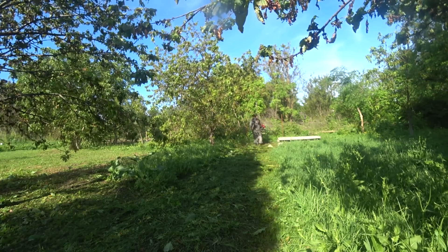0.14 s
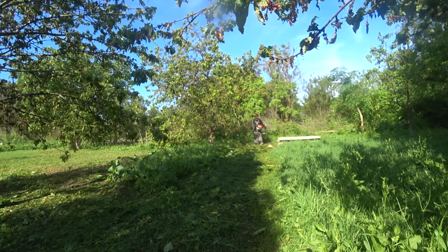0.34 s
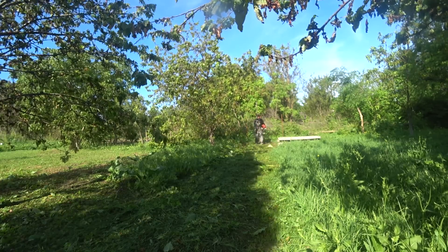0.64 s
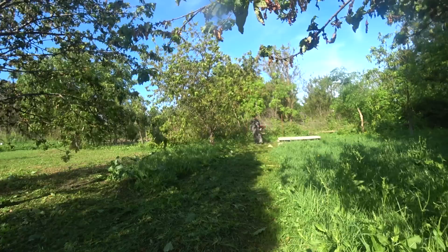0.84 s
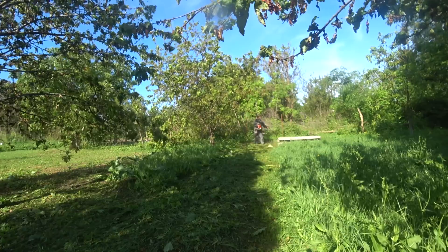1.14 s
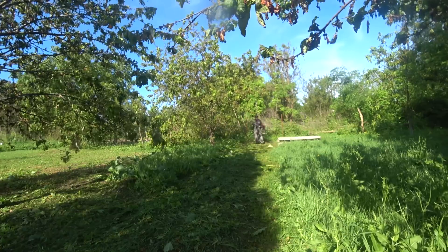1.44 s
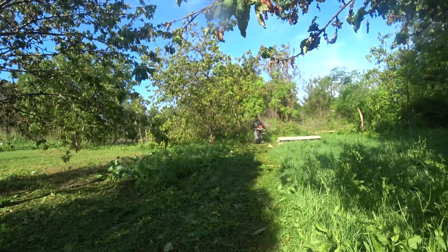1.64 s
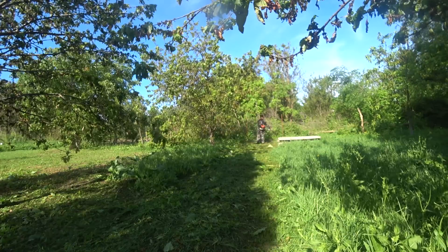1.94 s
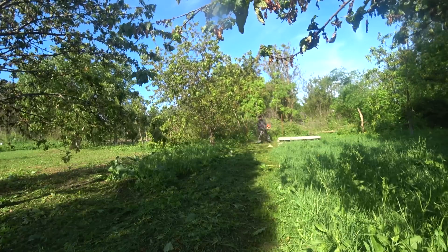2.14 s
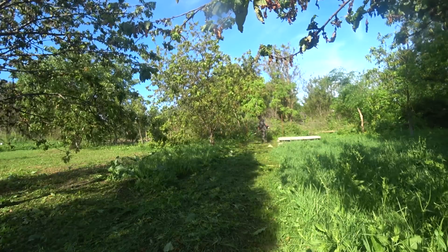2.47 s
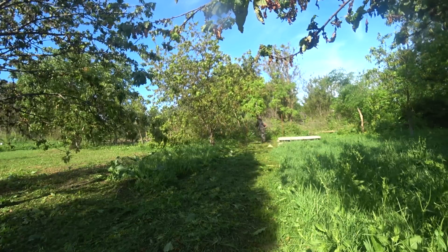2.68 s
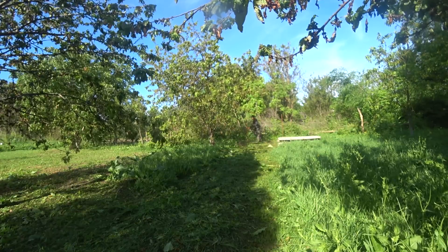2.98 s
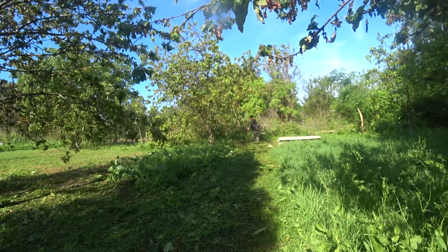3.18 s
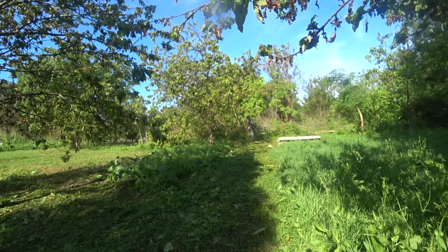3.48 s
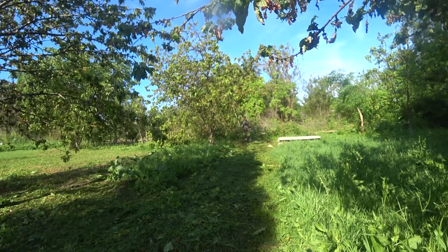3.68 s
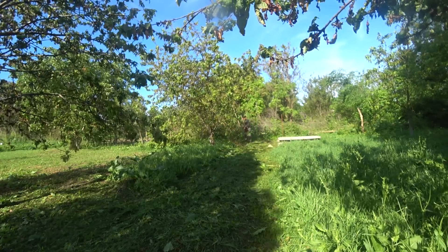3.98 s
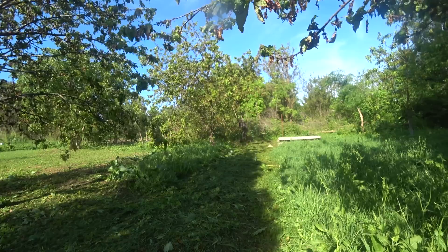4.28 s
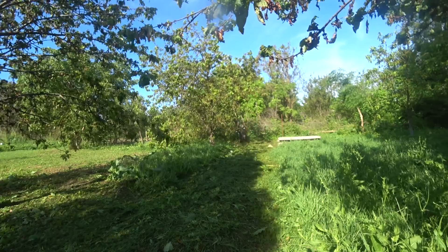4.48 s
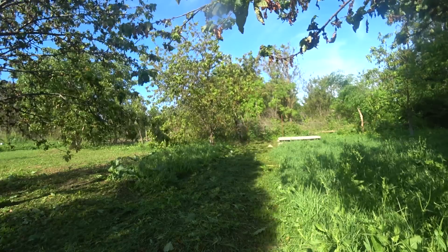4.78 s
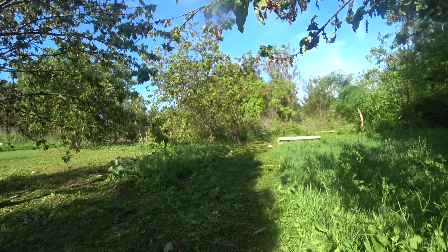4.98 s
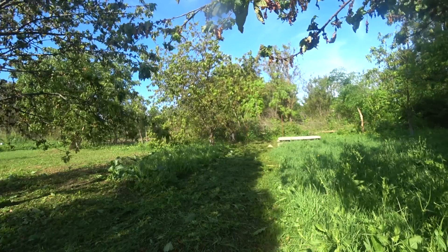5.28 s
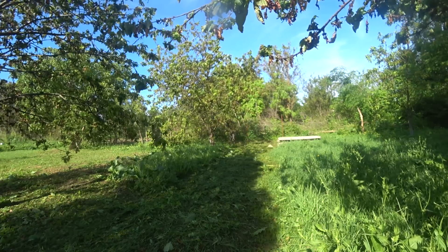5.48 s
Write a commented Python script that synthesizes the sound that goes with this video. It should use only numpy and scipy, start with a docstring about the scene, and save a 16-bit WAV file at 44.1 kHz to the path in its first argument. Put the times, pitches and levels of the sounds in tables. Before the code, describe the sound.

A petrol string trimmer runs continuously at full speed some distance away in a grassy orchard. Its high, raspy whine wavers with each swing and dips briefly in thick grass, most deeply just after two seconds. Bright swishing and engine hiss surround it. Later it sounds thinner and duller, with separate strokes through stalks. Open air, nearly mono, distant fixed microphone.

```python
"""A brush cutter runs flat out some way off in an orchard, swung from side to side through grass.
From the start its firings give a high whine, a stack of overtones that sags when the line bites into thick grass.
Exhaust and fan noise hisses once a firing, the line swishes as shaped bright noise, and wind adds a dull rumble.
From 2 s the worker moves behind trees and the overtones change; just after comes the deepest bite,
and the low rumble is faint after 2.2 s. Single puffs and strokes through long stalks follow, nearly mono."""
import sys
import numpy as np
from scipy import signal
from scipy.fft import rfft, irfft, next_fast_len
from scipy.io import wavfile
from scipy.ndimage import uniform_filter1d

SR = 44100
rng = np.random.default_rng(int(sys.argv[2]) if len(sys.argv) > 2 else 0)


def bounce(signal):
    """Save signal as a 16-bit WAV file at the path given by the first command-line argument."""
    frames = np.transpose(np.atleast_2d(signal))
    limited = np.clip(frames, -1, 1)
    pcm = np.round(limited * 32767).astype(np.int16)
    wavfile.write(sys.argv[1], SR, pcm)


N = 247842

# Lead overtones, whose levels are set one by one: (multiple of the firing rate)
LEAD_ORDERS = [1, 2, 3, 4, 5, 6, 7, 8, 9, 10, 12, 13, 21]
# Tone colour of the line in the stalks: (frequency [Hz], relative level [dB per Hz])
SWISH_COLOUR = [(300, -90), (4000, -40), (9000, -9), (11500, 0), (14000, 0), (16000, 2)]
HIGH_ORDER = 8  # first of the high overtones


def undb(db):
    """Turn decibels into a gain."""
    return 10 ** (np.asarray(db) / 20)


def columns(table):
    """Draw every column after the time column as a curve over all samples."""
    s, *rest = np.transpose(table)
    return [np.interp(np.arange(N) / SR, s, c) for c in rest]


def hump(s, rise_s, hold_s, back_s):
    """Rise smoothly to 1 at time s, hold, then fall back quickly at first and ever more slowly."""
    t = np.arange(N) / SR - s
    rise = np.sin(np.pi / 2 * np.clip(1 + t / max(rise_s, 1 / SR), 0, 1)) ** 2
    fall_back = np.exp(-np.clip(t - hold_s, 0, None) / back_s)
    return rise * fall_back


def bursts(base_db, events):
    """Add the power of bell-shaped bursts to a base level; all in dB."""
    t = np.arange(N) / SR
    power = 0
    for s, db, length in events:
        bell = np.exp(-np.minimum((4 * (t - s) / length) ** 2, 99))
        power = power + undb(2 * db) * bell
    return 10 * np.log10(undb(2 * base_db) + power)


def walk(rate):
    """Wander smoothly between random levels, about `rate` new ones a second, with a spread near 1."""
    k = int(SR / rate)
    steps = np.repeat(rng.standard_normal(N // k + 1), k)
    smooth = uniform_filter1d(uniform_filter1d(steps, k), k)
    return 1.35 * smooth[:N]


def colour(x, shape):
    """Give white noise the tone colour of (Hz, dB) points, then bring its average strength (rms) to 1."""
    n = next_fast_len(N)
    hz, db = np.transpose(shape)
    bin_hz = np.arange(n // 2 + 1) * SR / n
    gain = undb(np.interp(np.log(bin_hz + 1), np.log(hz), db))
    y = irfft(rfft(x, n) * gain, n)[:N]
    return y / np.sqrt(np.mean(y ** 2))


def whine(hz, turns, lead_db, fade_rate=9., high_fade_rate=14., flutter_db=1.5, edge_db=0.35):
    """Sum overtones of the firing rate; those between the leads copy their neighbours and fade by echoes."""
    # Usual balance of the overtones: (multiple of the firing rate, level [dB])
    order_db = [(1, -21), (2, -21), (3, -8), (4, -16), (5, -6), (6, -6), (7, -11), (8, -4), (9, -5),
                (10, -9), (11, -9), (12, -4), (13, -1), (14, -9), (15, -11), (16, -11), (17, -13),
                (18, -11), (19, -14), (20, -12), (21, -9), (22, -13), (23, -16), (24, -13), (25, -14),
                (26, -18), (27, -18)]
    # Ringing of the silencer, which lifts an overtone that sags onto it: centre [Hz], width [Hz], lift [dB]
    silencer = (3574, 130, 7.7)
    orders, usual_db = np.transpose(order_db)
    ring_hz, width_hz, ring_db = silencer
    lift_db = [db - usual_db[k - 1] for k, db in zip(LEAD_ORDERS, lead_db)]
    turns = turns + .003 * walk(60)  # uneven firing shakes the timing, most heard high up
    labour_hz = np.clip(550 - hz, 0, 40)  # below 550 firings a second the engine counts as labouring
    out = 0
    for k, db in zip(orders, usual_db):
        # blend the lifts of the lead overtones on either side
        place = np.interp(k, LEAD_ORDERS, np.arange(len(LEAD_ORDERS)))
        below = min(int(place), len(LEAD_ORDERS) - 2)
        db = db + (below + 1 - place) * lift_db[below] + (place - below) * lift_db[below + 1]
        db = db - edge_db * labour_hz * max(k - 2 * HIGH_ORDER, 0)  # a labouring engine loses its edge
        db = db + flutter_db * walk(50)
        db = db + ring_db / (1 + (2 * (k * hz - ring_hz) / width_hz) ** 2)
        tone = np.exp(2j * np.pi * (k * turns + rng.random()))
        if k not in LEAD_ORDERS:
            scattered = .2 + .03 * k  # echo share grows with pitch
            # short waves break up faster in the air
            rate = high_fade_rate if k > LEAD_ORDERS[-2] else fade_rate
            # straight path plus drifting echoes off ground and trunks
            paths = 1 + scattered * (walk(rate) + 1j * walk(rate))
            tone = tone * paths / np.sqrt(1 + 2 * scattered ** 2)
        out = out + np.sqrt(2) * undb(db) * tone.imag
    return out


def leads(loss_db):
    """Set the level [dB] of each lead overtone from swing, colour shift, trees, bites and its own waver."""
    # Swing of the cutter: (time [s], whine level [dB], turn [about -1..1], second colour shift [-1..1])
    swing = [(0.0, -0.3, 0.0052, 0.24), (0.1, -0.3, 0.38, 0.39), (0.27, 0.5, 0.78, 0.25),
             (0.37, 2.5, -0.22, -0.21), (0.47, 0, -0.99, 0.51), (0.58, -1.6, -0.99, 0.38),
             (0.65, 1.5, -0.23, -0.16), (0.8, -1, 0.78, 0.33), (0.97, -0.3, 0.89, 0.59),
             (1.06, 1.6, -0.64, -0.12), (1.16, -0.9, -0.73, 0.016), (1.28, 1.1, -1, 0.017),
             (1.37, 0.2, 0.01, 0.14), (1.47, -2.3, 0.99, 0.64), (1.61, 0.2, 0.62, 0.3),
             (1.69, 1, -0.11, -0.25), (1.78, -2, -1.02, 0.038), (1.87, -0.5, -0.52, 0.31),
             (2.0, 2, -0.52, 0.16), (2.13, -1.7, 0.21, 0.16), (2.38, -0.7, 0.19, -0.18),
             (2.55, -1, -0.034, -0.43), (2.75, 1, 0.43, -0.08), (2.94, -0.2, -0.13, -0.45),
             (3.1, 0.3, 0.07, -0.7), (3.25, 2.5, 0.77, -0.5), (3.5, 0.5, 0.0078, -0.58),
             (3.7, 2, 0.31, -0.25), (3.9, 1.7, -0.11, -0.42), (4.08, -1.8, -0.36, -0.7),
             (4.16, -1.5, 0.26, 0.63), (4.3, -0.8, -0.17, -0.33), (4.45, -0.5, 0.34, -0.56),
             (4.57, 1.5, -0.28, -0.22), (4.69, -1.5, 0.32, -0.71), (4.8, -0.5, -0.042, 0.17),
             (4.98, 0, 0.41, 0.44), (5.12, 0.3, -0.47, 0.11), (5.22, 0, 0.14, 0.28),
             (5.35, 0.5, -0.49, 0.6), (5.44, -1, -0.068, 0.63), (5.62, -0.9, 0.034, 0.92)]
    # One row per lead overtone: (starting level [dB], change at full turn [dB], change at full shift [dB],
    # change behind the trees [dB], share of the loss in a bite [ratio])
    lead_levels = [(-54.5, -0.5, 1.8, -8.5, 0.77), (-59, 2.7, -5, 1.8, 0.16), (-42.5, 2.5, 2, -3, 1.03),
                   (-52, 4.5, 0.5, -0.5, 0.8), (-40, 4.5, -4, -8.5, 0.9), (-42, 2.5, -5, -5.5, 2.1),
                   (-46.5, 1.5, 6.5, -5.5, 0.39), (-38.5, -3.5, -3, -3.5, 0.96),
                   (-38.5, -1.5, -3.1, -10, 1.2), (-44.5, -3.3, -2.5, -5.5, 0.7),
                   (-37, -2.5, 6.5, -18, 0.82), (-35.5, -4, 0.2, -8, 1.2), (-42, -2.2, 4.5, -6, 0.55)]
    # How much each lead overtone wavers by itself: (spread [dB])
    lead_waver_db = [0.31, 2.74, 0.73, 2.3, 1.4, 2.5, 2.5, 1.92, 2.2, 2.4, 3.14, 2.45, 1.3]
    level_db, turn, shift = columns(swing)
    trees_from_s, trees_full_s = 1.96, 5.08  # the worker moves behind trees
    trees = np.clip((np.arange(N) / SR - trees_from_s) / (trees_full_s - trees_from_s), 0, 1)
    out_db = []
    for k, row, waver_db in zip(LEAD_ORDERS, lead_levels, lead_waver_db):
        db, turn_db, shift_db, trees_db, share = row
        db = db + level_db + turn_db * turn + shift_db * shift + trees_db * trees
        db = db - share * loss_db[int(k >= HIGH_ORDER)]
        out_db.append(db + waver_db * walk(15))
    return out_db


def bites():
    """Thick grass drags the line: firing slows [Hz], low and high overtones lose dB, hiss changes by dB."""
    # Bites into thick grass: (time at the slowest [s], drop [Hz], fall [s], hold [s],
    # loss of low overtones [dB], loss of high overtones [dB, minus = gain], extra hiss [dB])
    bite_list = [(0.197, 31.87, 0.043, 0.019, 5.7, -3.5, -1.5), (0.874, 30.93, 0.035, 0.024, 5.8, 0, 1),
                 (1.531, 37.96, 0.048, 0.019, 4.84, -0.5, 2), (2.193, 112, 0.045, 0.099, 21.5, 21, -2.5),
                 (2.458, 52.06, 0.041, 0.011, 21, 14, 2), (3.028, 39.96, .06, 0.0051, 8.5, 8, -1.5),
                 (3.55, 30.07, 0.076, .005, 3.2, -1.5, -5.5),
                 (3.792, 29.94, 0.077, 0.00516, 1.8, 1.5, -1.5),
                 (4.225, 39.94, 0.068, 0.0052, 5.3, -0.5, -.5), (4.914, 72.04, 0.063, .005, 23.7, 16, -2),
                 (5.528, 43.7, 0.053, 0.0055, 14.5, -4, 1)]
    recover_s, loss_recover_s = .025, 0.01  # time constants of the return
    early_s = 0.0091  # the whine thins this much before the speed is lowest
    sag_hz, low_db, high_db, extra_db = 0, 0, 0, 0
    for s, drop_hz, fall_s, hold_s, low_loss_db, high_loss_db, gas_db in bite_list:
        sag = hump(s, fall_s, hold_s, recover_s)
        thin = hump(s - early_s, fall_s - early_s, hold_s + early_s / 2, loss_recover_s)
        sag_hz = sag_hz + drop_hz * sag
        extra_db = extra_db + gas_db * sag
        low_db = low_db + low_loss_db * thin
        high_db = high_db + high_loss_db * thin
    return sag_hz, (low_db, high_db), extra_db


def hiss(turns, db, pulse=0.15):
    """Exhaust gas and cooling fan make rushing noise that swells once a firing."""
    # Tone colour of gas and fan: (frequency [Hz], relative level [dB per Hz])
    hiss_colour = [(120, -78), (220, -44), (400, -36), (680, -32), (900, -23.5), (1400, -19), (1950, -19.5),
                   (2500, -14.5), (3600, -7.5), (5200, -4.5), (7000, -0.5), (9500, -2.5), (16000, -33.5)]
    puffs = (1 + pulse * np.cos(2 * np.pi * turns)) * rng.standard_normal(N)
    flicker_db = .7 * walk(30)
    return undb(db + flicker_db) * colour(puffs, hiss_colour)


def swish(db, grain_db=1.0):
    """The line slaps through stalks: many tiny hits blur into bright noise of quickly changing strength."""
    slaps = rng.standard_normal(N) * undb(grain_db * walk(900))
    return undb(db) * colour(slaps, SWISH_COLOUR)


def wind(db):
    """Swirling air on the microphone makes dull noise in short puffs."""
    # Tone colour of the wind: (frequency [Hz], relative level [dB per Hz])
    wind_colour = [(20, -4.5), (100, -7), (300, -8), (600, -9.5), (1500, -10.5), (3000, -61)]
    puff_db = 2 * walk(60)
    return undb(db + puff_db) * colour(rng.standard_normal(N), wind_colour)


def scene():
    """Put the cutter and wind in the middle; trees scatter a little unrelated treble to either side."""
    # Speed between the bites: (time [s], firing rate [Hz])
    speed = [(0.0, 552.5), (0.055, 560.5), (0.15, 554), (0.305, 561.7), (0.575, 554.6), (0.615, 564),
             (0.685, 555), (0.73, 561.8), (0.94, 552.7), (1.025, 559), (1.12, 550.6), (1.455, 563.2),
             (1.6, 559), (1.705, 562.3), (1.965, 548), (2.03, 563), (2.14, 567.2), (2.28, 537.5),
             (2.38, 552), (2.51, 546), (2.64, 554), (2.765, 548.6), (2.945, 562), (3.085, 558.8),
             (3.195, 566.5), (3.335, 559.7), (3.47, 571), (3.72, 561.7), (3.915, 567), (4.095, 550),
             (4.285, 564), (4.48, 550), (4.555, 565.3), (4.625, 551.4), (4.8, 556), (5.165, 558),
             (5.215, 551.7), (5.465, 564.4), (5.62, 563.5)]
    # Steady noises before bites and strokes: (time [s], engine hiss level [dB], line swish level [dB])
    rush = [(0.0, -33, -24.5), (0.26, -32, -27), (0.48, -31.5, -26), (0.87, -34.5, -28), (0.98, -33, -26),
            (1.44, -32, -27), (1.59, -31.5, -28), (1.92, -34, -26), (2.07, -33, -25.5), (2.14, -30, -25.5),
            (2.24, -33, -32.5), (2.41, -34.5, -28), (2.6, -34.5, -31.5), (2.95, -35, -32),
            (3.3, -32.5, -30), (3.65, -32.5, -32.5), (4.12, -36.5, -32.5), (4.9, -36, -34),
            (5.3, -36, -34.5), (5.62, -33, -28.5)]
    # Strokes through long stalks: (time [s], swish level [dB], length [s])
    strokes = [(2.723, -23.5, 0.12), (3.056, -33, 0.063), (3.258, -24.5, 0.22), (3.49, -35, .07),
               (3.743, -25.5, 0.16), (3.837, -27, .05), (4.021, -32, 0.07), (4.18, -34, 0.047),
               (4.386, -31, 0.094), (4.608, -32, 0.11), (5.04, -29, .12), (5.24, -34, .08),
               (5.506, -36, .1)]
    # Low dull rumble before its random waver, faint after 2.2 s: (time [s], level [dB])
    rumble = [(0.0, -61), (0.25, -71), (0.37, -60.5), (0.5, -59.5), (0.74, -60.5), (0.86, -76), (1.0, -68),
              (1.03, -58), (1.14, -67), (1.27, -63.5), (1.45, -72), (1.55, -68), (1.69, -62.5), (2.0, -70),
              (2.06, -58), (2.14, -66), (2.22, -103), (5.62, -108)]
    # Single puffs of wind after 2.2 s: (time [s], peak level [dB], length [s])
    single_puffs = [(2.359, -72, 0.029), (2.531, -70, .05), (2.701, -68, 0.068), (2.77, -78, .06),
                    (2.901, -62, .025), (3.243, -63.5, 0.1), (3.318, -68, 0.052), (3.408, -68, 0.038),
                    (3.61, -89, 0.046), (3.72, -68, 0.045), (3.841, -83, 0.056), (4.309, -87, 0.064),
                    (4.885, -74, 0.036), (4.995, -82, .06)]
    sag_hz, loss_db, extra_db = bites()
    # the flywheel rounds sudden changes of speed
    hz = uniform_filter1d(columns(speed)[0] - sag_hz, size=600)
    turns = np.cumsum(hz) / SR  # firings counted so far
    hiss_db, steady_db = columns(rush)
    swish_db = bursts(steady_db, strokes)
    rumble_db = columns(rumble)[0] + 3.5 * walk(18)
    wind_db = bursts(rumble_db, single_puffs)
    engine = whine(hz, turns, leads(loss_db)) + hiss(turns, hiss_db + extra_db)
    mid = engine + swish(swish_db) + wind(wind_db)
    scatter = undb(swish_db - 14) * colour(rng.standard_normal(N), SWISH_COLOUR)
    return np.array([mid + scatter, mid - scatter])


def record(dry):
    """The right port of the microphone favours the treble a little; the recorder cuts the top."""
    high_pass = signal.butter(2, 5500, "high", fs=SR, output="sos")
    treble = signal.sosfiltfilt(high_pass, dry)
    tilted = dry + .085 * treble * np.array([[-1], [1]])
    top_cut = signal.ellip(12, .2, 80, 15720, fs=SR, output="sos")  # steep cut above 15720 Hz
    return signal.sosfilt(top_cut, tilted)


dry = scene()
out = record(dry)
bounce(out)
```